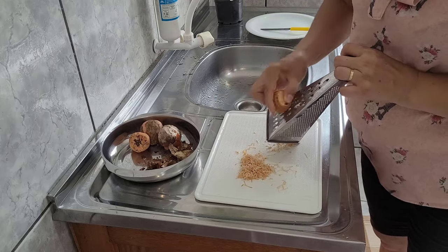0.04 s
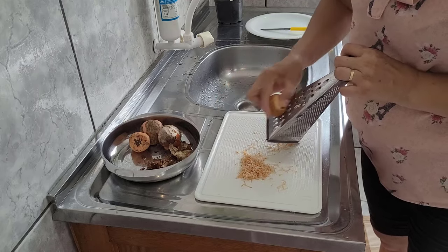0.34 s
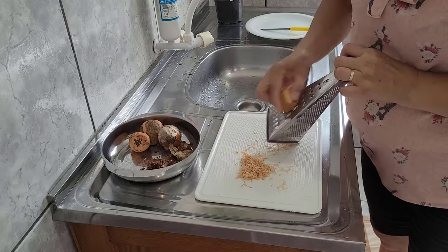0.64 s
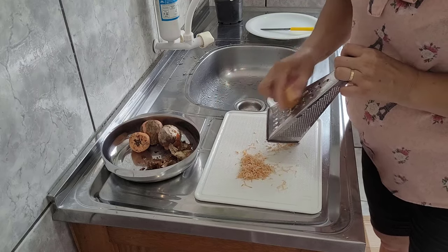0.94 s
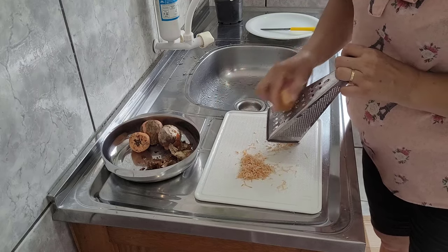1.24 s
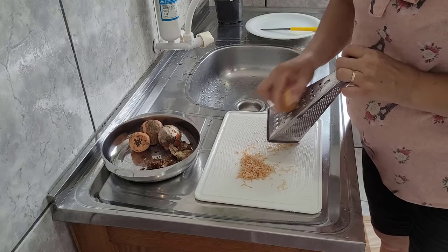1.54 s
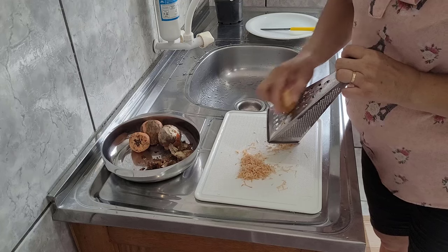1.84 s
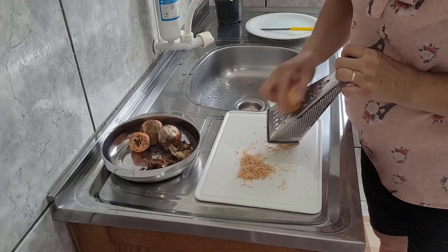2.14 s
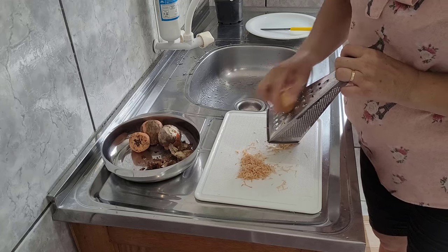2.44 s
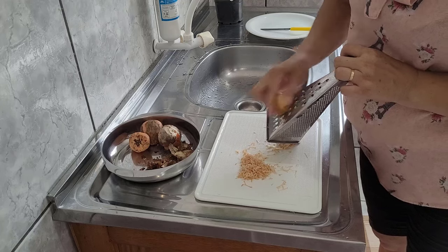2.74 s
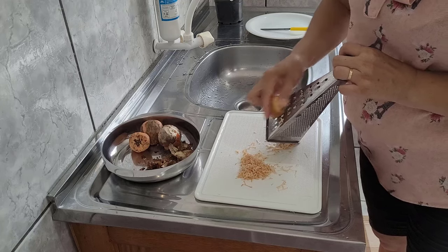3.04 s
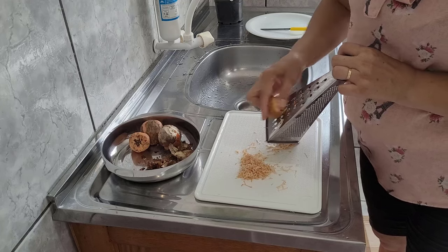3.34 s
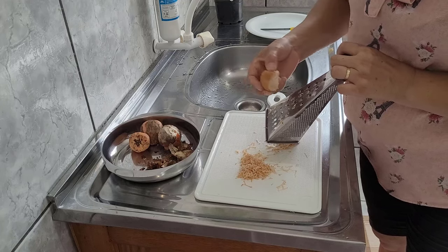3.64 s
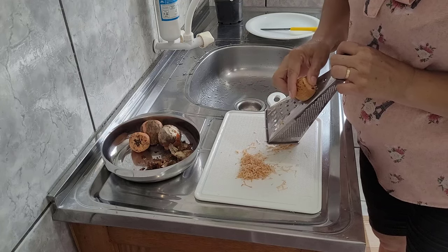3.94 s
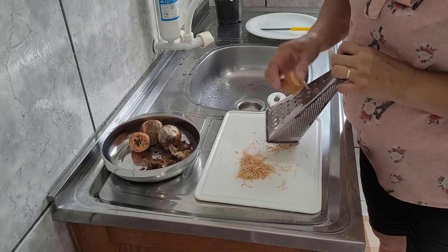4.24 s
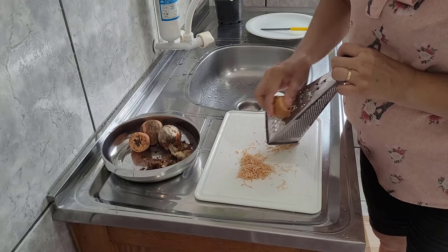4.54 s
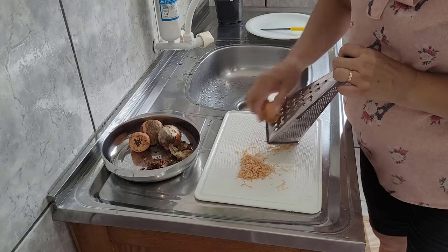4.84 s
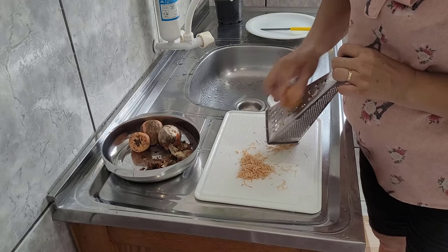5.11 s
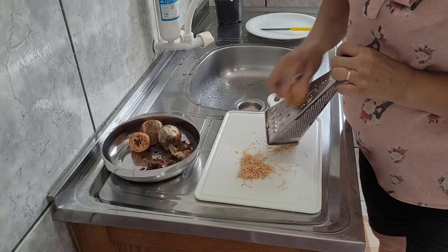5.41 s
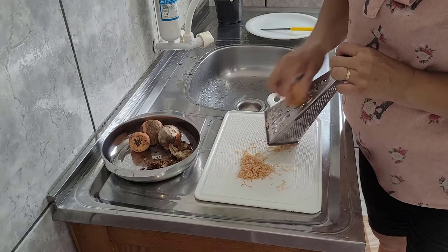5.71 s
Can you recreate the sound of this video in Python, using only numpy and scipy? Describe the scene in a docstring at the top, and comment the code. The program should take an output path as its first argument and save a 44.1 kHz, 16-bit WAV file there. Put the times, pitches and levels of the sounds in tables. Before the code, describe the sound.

Rhythmic scraping of a hard seed against a metal grater, with low rattling thuds and one brief pause with soft knocks.

```python
"""Quick, even rasping strokes: a hard seed is grated on a steel box grater leaning on a board over a sink.
The teeth tear the seed in dense clicks that ring the steel; each push ends in a judder of board and sink.
The hand pauses once and sets the seed back with soft knocks and brushes.
A tiled kitchen rings on between the strokes, over a faint hush."""
import sys
import numpy as np
from scipy import signal
from scipy.fft import rfft, irfft
from scipy.io import wavfile

SR = 44100
rng = np.random.default_rng(int(sys.argv[2]) if len(sys.argv) > 2 else 0)


def generate_wav(sig):
    """Save sig (samples, or channels by samples) to the path in sys.argv[1] as 16-bit PCM at SR."""
    pcm = np.round(np.clip(np.atleast_2d(sig).T, -1, 1) * 32767).astype(np.int16)
    wavfile.write(sys.argv[1], SR, pcm)


N = 263277
TIME_S = np.arange(N) / SR

# Forward strokes. Each row: start in seconds, length in seconds, rasp, bite and judder in relative dB.
PUSHES = [(-0.03, 0.12, -23.5, -25.5, -30), (0.263, 0.15, -25.5, -21.5, -28),
          (0.59, 0.14, -25.5, -18.5, -28), (0.895, 0.15, -26.5, -18, -24.5), (1.203, 0.12, -22, -28.5, -30),
          (1.499, 0.15, -23, -20, -24.5), (1.808, 0.12, -23, -24.5, -32.5),
          (2.108, 0.14, -20.5, -18.5, -28), (2.413, 0.12, -20.5, -18, -28), (2.707, 0.12, -22, -19, -34.5),
          (2.99, 0.13, -22.5, -20.5, -30.5), (3.267, 0.1263, -22, -21.5, -30),
          (4.446, 0.17, -31.5, -24.5, -37.5), (4.768, 0.17, -25, -26.5, -27),
          (5.092, 0.12, -24, -22.5, -27), (5.384, 0.13, -23, -22, -31), (5.691, 0.15, -22.5, -26, -30)]
# Knocks on the grater. Each row: start in seconds, level in relative dB, steel against board in dB.
SEED_KNOCKS = [(3.84, -32, 1), (4.388, -28, -8)]
# Seed brushing the teeth. Each row: start in seconds, length in seconds, level in relative dB.
SEED_BRUSHES = [(3.905, 0.033, -38), (3.96, 0.027, -45.5), (4.406, 0.18, -35)]

# Resonances. Each row: frequency in Hz, bandwidth in Hz, level in relative dB.
STEEL_MODES = [(828, 30, -9), (883, 28, -5), (965, 35, -8), (1009, 30, -3), (1234, 30, -11),
               (1550, 30, -11), (1662, 28, -8), (1838, 22, -7), (2061, 20, -10), (2223, 20, -2),
               (2275, 70, -3), (2390, 70, -3), (2463, 45, -1.5), (2540, 80, -6), (2639, 35, -10),
               (2794, 35, -13), (3224, 60, -12), (3330, 120, -7), (6339, 140, -17), (7298, 170, -17)]
FACE_MODES = [(1250, 200, -22), (1068, 193, -9), (920, 250, -11)]  # grating face, top to foot
BOARD_MODES = [(159, 54, 1.5), (226, 30, -2.5), (266.3, 28, -2), (290.6, 12, -6.5), (320, 11.3, 0.5),
               (352, 31, -2.5), (401.7, 17, -3.5), (461.6, 19, -5.5)]  # board and grater frame
COUNTER_MODES = [(52, 7, 0), (62, 10, 0), (79, 14, -6)]  # counter and sink bowl, deepest sway
SINK_MODES = [(103, 11, 0), (128, 9, -4), (148, 14, -8), (168, 24, -8)]  # sink and counter, boom

# Spectra of single clicks and of the hush. Each row: frequency in Hz, density in relative dB.
RASP_SPECTRUM = [(200, -4.5), (450, -15.5), (700, -6), (1050, -5), (1400, 0), (2400, 5), (2900, 0.5),
                 (3400, 0), (4300, -4.5), (6000, -13), (9000, -12), (16000, -33.5)]
HISS_SPECTRUM = [(500, -20), (2000, -2), (3500, 4), (5000, 3), (6300, 1), (7400, 1), (8800, -3),
                 (10500, -2), (12300, -1), (14000, -1.5), (16000, -2)]
THUD_SPECTRUM = [(60, -23), (150, 6.5), (200, -3), (260, -5.5), (400, -2.5), (500, -2.5), (650, -6.5),
                 (900, -9.5), (1500, -12), (4000, -52)]
HUSH_SPECTRUM = [(20, -8), (50, 0), (120, -5), (300, -10), (1000, -22), (3500, -26), (8000, -38),
                 (16000, -50)]
TAP_SPECTRUM = [(200, -6), (500, -2.5), (1100, 2), (1700, -4.5), (2500, -5), (3500, -13), (7000, -28),
                (16000, -46)]

# Decay of the echo as heard; the very top cuts off fastest. Each row: frequency in Hz, T60 in seconds.
ECHO_T60 = [(60, 0.77), (150, 0.87), (300, 0.8), (1000, 0.84), (2300, 0.75), (4500, 0.66), (8000, 0.49),
            (12500, 0.46), (16000, 0.28)]
# Echo width. Each row: frequency in Hz, left-right correlation from -1 to 1.
ECHO_CORRELATION = [(60, 0.92), (150, 0.89), (280, 0.83), (500, 0.6), (1000, -0.058), (2000, 0.091),
                    (4000, -0.12), (8000, 0.27), (14000, -0.34)]
# The near left wall returns more treble. Each row: frequency in Hz, left minus right in dB.
ECHO_BALANCE = [(100, 1), (380, -1.5), (700, 2), (1300, -1), (2400, 1.5), (4400, 0), (8000, 0),
                (14000, 2.5)]


def undb(db):
    """Decibels to gain."""
    return 10 ** (np.asarray(db) / 20)


def along(points, hz):
    """Interpolate (Hz, value) points on a log-frequency axis."""
    point_hz, value = np.transpose(points)
    return np.interp(np.log(np.maximum(hz, 1)), np.log(point_hz), value)


def unit(response):
    """Scale to unit energy."""
    return response / np.sqrt(np.sum(response ** 2))


def colour(spectrum, size=2048):
    """Minimum-phase click with this spectral shape; unit energy."""
    magnitude = undb(along(spectrum, np.fft.rfftfreq(size, 1 / SR)))
    cepstrum = irfft(np.log(magnitude))
    cepstrum[1:size // 2] *= 2
    cepstrum[size // 2 + 1:] = 0
    return unit(irfft(np.exp(rfft(cepstrum))))


def modes(table):
    """Ring of a struck body: decaying sines of alternating sign; unit energy."""
    t = TIME_S[:SR // 2]
    ring = 0
    for k, (hz, width_hz, db) in enumerate(table):
        mode = np.exp(-np.pi * width_hz * t) * np.sin(2 * np.pi * hz * t)
        ring += (-1) ** k * undb(db) * unit(mode)
    return unit(ring)


def through(x, response):
    """Excite a response with x."""
    return signal.fftconvolve(x, response)[:N]


def swell(start_s, length_s, power=1):
    """Half-sine force pulse, raised to a power."""
    progress = np.clip((TIME_S - start_s) / length_s, 0, 1)
    return np.maximum(np.sin(np.pi * progress), 0) ** power


def clicks(rate_hz, scatter_db):
    """Random catches of uneven size; rms 1."""
    size = undb(scatter_db * np.clip(rng.standard_normal(N), -2, 2))
    sign = rng.choice([-1, 1], N)
    train = size * sign * (rng.random(N) < rate_hz / SR)
    return train / np.sqrt(np.mean(train ** 2))


def seed_contact(lift_s=3.5, return_s=4.45, fade_s=0.14):
    """1 while the seed rests on the teeth, back strokes included; 0 in the pause."""
    return np.clip(np.maximum(lift_s - TIME_S, TIME_S - return_s) / fade_s, 0, 1)


def grip(rate_hz, spread_db):
    """Uneven hold as rows of teeth catch and let go; mean power 1."""
    knots_s = np.arange(0, TIME_S[-1] + 1, 1 / rate_hz)
    wobble = np.clip(rng.standard_normal(len(knots_s)), -2, 2)
    gain = undb(spread_db * np.interp(TIME_S, knots_s, wobble))
    return gain / np.sqrt(np.mean(gain ** 2))


def travel(spots):
    """Gains of spots along the grater as the seed goes down and back; powers sum to 1."""
    turns_s = np.ravel([(start_s, start_s + length_s) for start_s, length_s, *_ in PUSHES])
    place = np.interp(TIME_S, turns_s, [0, spots - 1] * len(PUSHES))
    return [np.sqrt(np.maximum(1 - np.abs(place - spot), 0)) for spot in range(spots)]


def tooth_force(contact, hold, slide_db=-44, bite_gain_db=-2, bite_share=0.59, bite_s=0.06):
    """Teeth catch the seed; each stroke's deepest bite adds fewer, harder catches."""
    push, bite = undb(slide_db) * contact, 0
    for start_s, length_s, rasp_db, bite_db, _ in PUSHES:
        push += undb(rasp_db) * swell(start_s, length_s, power=1.39)
        bite += undb(bite_db) * swell(start_s + bite_share * length_s - bite_s / 2, bite_s)
    fine = clicks(rate_hz=2000, scatter_db=4) * push
    coarse = clicks(rate_hz=600, scatter_db=4.5) * bite
    return hold * (fine + undb(bite_gain_db) * coarse)


def face_flex(force):
    """The face widens towards its foot, so it rings lower as the seed goes down."""
    return sum(undb(db) * through(force * near, modes([(hz, width_hz, 0)]))
               for (hz, width_hz, db), near in zip(FACE_MODES, travel(len(FACE_MODES))))


def grating(contact, hold, crunch_db=-3, steel_db=-5):
    """Some teeth crack the seed, others ring the box or flex its face."""
    crack, pluck, flex = (tooth_force(contact, hold) for _ in range(3))
    crunch = undb(crunch_db) * through(crack, colour(RASP_SPECTRUM))
    ring = undb(steel_db) * through(pluck, modes(STEEL_MODES))
    return crunch + ring + face_flex(flex)


def fibre_hiss(contact, hold, gain_db=4.5, slide_db=-52, base_db=-27, usual_rasp_db=-23, db_per_db=0.52):
    """Tearing fibres hiss; the hiss grows more slowly than the rasp."""
    envelope = undb(slide_db) * contact
    for start_s, length_s, rasp_db, _, _ in PUSHES:
        hiss_db = base_db + db_per_db * (rasp_db - usual_rasp_db)
        envelope += undb(hiss_db) * swell(start_s, length_s, power=1.09)
    tears = clicks(rate_hz=5000, scatter_db=6) * np.sqrt(hold) * envelope
    return undb(gain_db) * through(tears, colour(HISS_SPECTRUM))


def board(force, ring_db=-2, thud_db=-4):
    """The board rings briefly over a dull thud."""
    ring = undb(ring_db) * through(force, modes(BOARD_MODES))
    return ring + undb(thud_db) * through(force, colour(THUD_SPECTRUM))


def judder_envelope(lag_s, peak_share=0.71, span_s=0.17):
    """One swell of set length, peaking late in each stroke."""
    return sum(undb(db) * swell(start_s + peak_share * length_s - span_s / 2 + lag_s, span_s)
               for start_s, length_s, _, _, db in PUSHES)


def judder(contact, counter_db=-6, sink_db=-1, board_db=-3.5, slide_db=-43):
    """The grater's foot chatters on the board, then shakes sink and counter; gives (rumble, clatter)."""
    rattle, shake = judder_envelope(lag_s=0), judder_envelope(lag_s=0.02)
    slide = undb(slide_db) * contact
    chatter = clicks(rate_hz=480, scatter_db=2.5)
    counter = through(chatter * (undb(counter_db) * shake + slide), modes(COUNTER_MODES))
    sink = through(chatter * (undb(sink_db) * shake + slide), modes(SINK_MODES))
    return counter + sink, board(chatter * (undb(board_db) * rattle + slide))


def house_hush(level_db=-65):
    """Faint, steady low noise of the house."""
    return undb(level_db) * through(rng.standard_normal(N), colour(HUSH_SPECTRUM))


def touches(knock_s=0.017, ring_db=-15, counter_db=-6, brush_board_db=2, rasp_db=-4, hiss_db=-2):
    """The seed knocks and brushes as it is turned and set back; gives (rumble, taps)."""
    grain = clicks(rate_hz=3600, scatter_db=0.5)
    knock = grain * sum(undb(db) * swell(start_s, knock_s) for start_s, db, _ in SEED_KNOCKS)
    brush = grain * sum(undb(db) * swell(start_s, length_s) for start_s, length_s, db in SEED_BRUSHES)
    strike = sum(undb(db + steel_db) * swell(start_s, knock_s) for start_s, db, steel_db in SEED_KNOCKS)
    strike *= clicks(rate_hz=3000, scatter_db=1)
    metal = through(strike, colour(TAP_SPECTRUM)) + undb(ring_db) * through(strike, modes(STEEL_MODES))
    teeth = through(brush, undb(rasp_db) * colour(RASP_SPECTRUM) + undb(hiss_db) * colour(HISS_SPECTRUM))
    rumble = through(knock + brush, modes(SINK_MODES) + undb(counter_db) * modes(COUNTER_MODES))
    return rumble, board(knock + undb(brush_board_db) * brush) + metal + teeth


def walls(build_s=0.00047):
    """Left and right echo of the tiles for one spot; the treble dies first."""
    t, hz = TIME_S[:SR], np.fft.rfftfreq(SR, 1 / SR)
    correlation = along(ECHO_CORRELATION, hz)
    mid, side = rfft(rng.standard_normal((2, SR))) * np.sqrt([1 + correlation, 1 - correlation])
    balance = undb(np.outer([1, -1], along(ECHO_BALANCE, hz)) / 2)
    field = np.array([mid + side, mid - side]) / np.sqrt(2) * balance
    echo = 0
    for band_hz, t60_s in ECHO_T60:
        band = along([(row_hz, row_hz == band_hz) for row_hz, _ in ECHO_T60], hz)
        decay = np.exp(-np.log(1000) * t / t60_s) * (1 - np.exp(-t / build_s))
        echo += irfft(field * band, SR) * unit(decay)
    return echo


def kitchen(x, direct_db=-6, echo_db=-1.77, left_lag_samples=3):
    """Direct sound plus an echo that changes as the seed travels along the grater."""
    echo = 0
    for near in travel(spots=8):
        echo += np.array([through(x * near, response) for response in walls()])
    direct = np.array([np.roll(x, left_lag_samples), x])  # grater slightly to the right
    return undb(direct_db) * direct + undb(echo_db) * echo


def scene(sink_direct_db=-8.5, sink_send_db=-6):
    """Grating, judder, hush and touches in the kitchen; stereo."""
    contact = seed_contact()
    hold = grip(rate_hz=110, spread_db=3)
    scrape = grating(contact, hold) + fibre_hiss(contact, hold)
    judder_rumble, clatter = judder(contact)
    touch_rumble, taps = touches()
    sink = judder_rumble + touch_rumble
    room = kitchen(scrape + clatter + house_hush() + taps + undb(sink_send_db) * sink)
    return room + undb(sink_direct_db) * sink  # close and wide, the sink arrives mostly direct


def record(dry, low_hz=42, top_hz=15800):
    """The phone drops the deepest bass and cuts the top."""
    highpass = signal.butter(6, low_hz, "high", fs=SR, output="sos")
    lowpass = signal.ellip(10, .2, 80, top_hz, fs=SR, output="sos")
    return signal.sosfilt(lowpass, signal.sosfilt(highpass, dry))


dry = scene()
out = record(dry)
generate_wav(out)
```